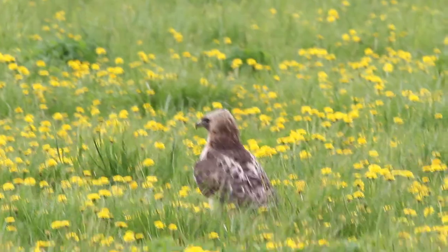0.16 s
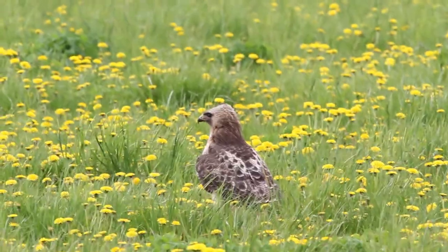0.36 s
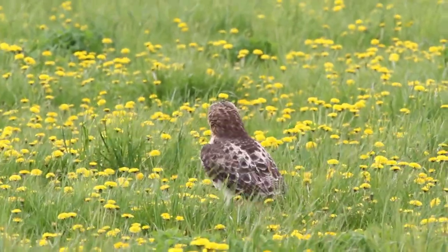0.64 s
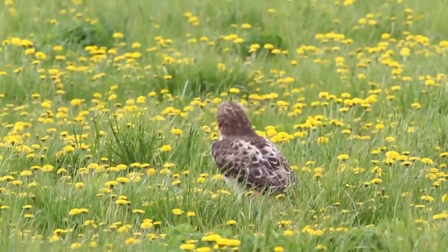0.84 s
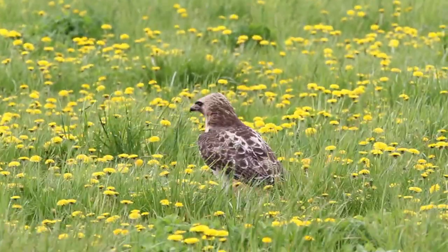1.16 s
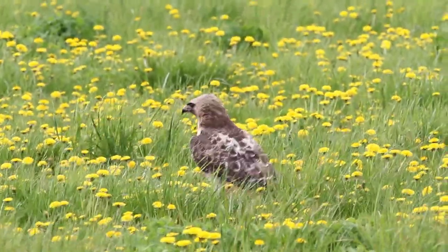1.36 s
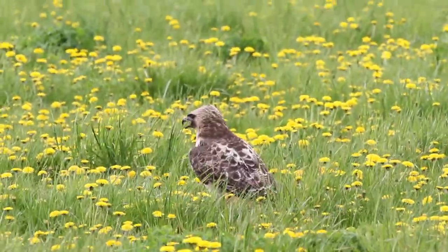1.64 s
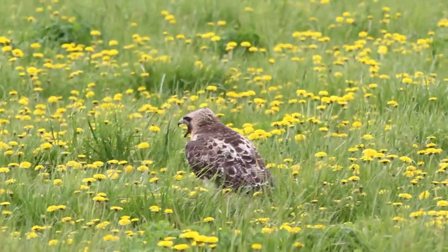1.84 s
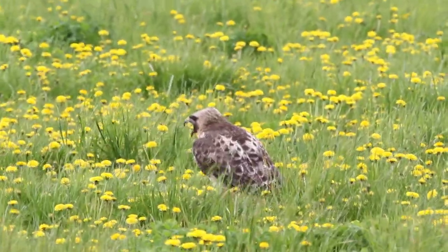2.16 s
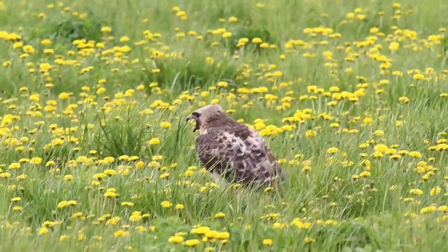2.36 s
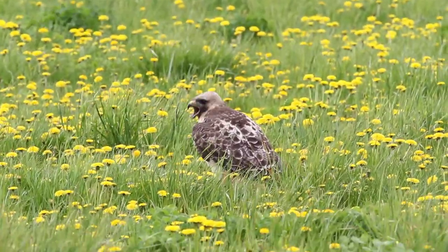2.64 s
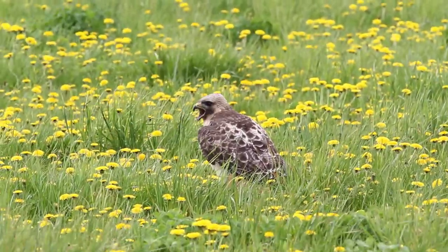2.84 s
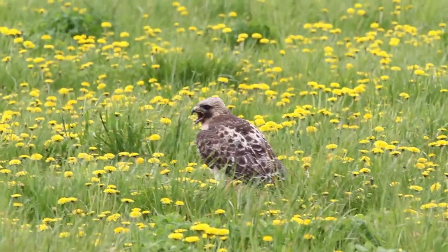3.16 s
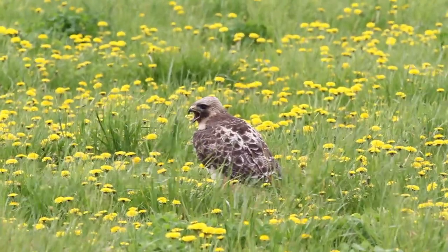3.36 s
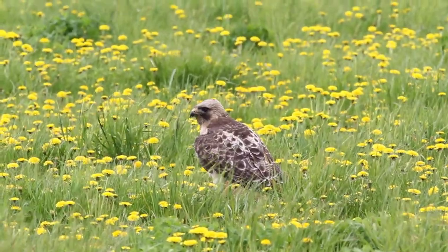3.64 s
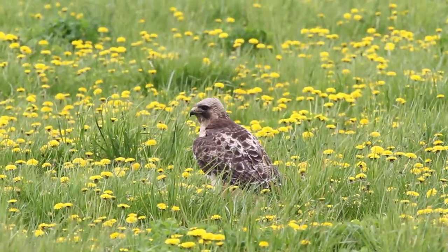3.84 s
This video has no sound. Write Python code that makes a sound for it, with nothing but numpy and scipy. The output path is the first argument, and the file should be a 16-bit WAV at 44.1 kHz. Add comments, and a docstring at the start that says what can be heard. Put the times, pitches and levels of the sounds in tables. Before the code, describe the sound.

Wind roars and thumps on an outdoor microphone over soft grassy hiss, then a hawk lets out one long, harsh, slightly falling scream, followed by stronger gusts; faint small birds chirp in the distance.

```python
"""A hawk on the ground in a meadow gives one long scream: a clear whistle that breaks into a hoarse rasp.
The scream is a jittered tone with its octave, plus throat-coloured noise.
Gusts buffet the microphone with a low roar, random pressure lumps and sharp thumps, all shaped pulses or noise.
Small birds far off whistle and chip as gliding tones; band noise rustles; patchy noise makes a soft field hiss."""
import sys
import numpy as np
from scipy import signal
from scipy.fft import rfft, irfft
from scipy.io import wavfile
from scipy.ndimage import uniform_filter1d

SR = 44100
rng = np.random.default_rng(int(sys.argv[2]) if len(sys.argv) > 2 else 0)


def digitize_waveform(pressure):
    """Quantize a signal to 16-bit integers and store it at the path in sys.argv[1].

    Rows of a 2-D input are taken as channels; values are limited to [-1, 1].
    """
    field = np.atleast_2d(pressure).T
    bounded = np.clip(field, -1, 1)
    quanta = np.round(bounded * 32767).astype(np.int16)
    wavfile.write(sys.argv[1], SR, quanta)


N = 176400

# Course of the gusts. Each row: time in seconds, relative level in dB.
GUSTS_S_DB = [(.07, -30), (.15, -24), (.4, -27.5), (.55, -36), (.66, -32.5), (.72, -13.5), (.76, -27.5),
              (.8, -40.5), (.97, -40.5), (1.12, -24.5), (1.25, -31), (1.33, -40.5), (1.65, -32),
              (1.92, -36.5), (1.97, -28), (2.05, -42), (2.13, -33.5), (2.17, -42), (2.3, -45),
              (2.35, -19.5), (2.42, -44), (2.6, -31), (2.72, -42.5), (2.9, -25.5), (3.05, -19), (3.3, -27),
              (3.42, -18), (3.5, -31.5), (3.7, -27), (3.9, -19.5)]
# Wind spectrum. Each row: frequency in Hz, relative density in dB.
WIND_HZ_DB = [(24, -13), (119, 4.5), (240, 1), (387, -11), (615, -23.5), (1200, -42.5), (1560, -58)]
# Sharp thumps. Each row: centre in seconds, level in dB before the tip is added, width scale in ms.
THUMPS = [(0.2116, -13.5, 1.9), (0.2242, -17.5, 1.32), (0.2442, -9.5, 2.02), (0.301, -14.5, 1.3),
          (.3336, -27.5, 0.61), (0.3878, -16.5, 1.9), (0.612, -13.5, 2.05), (0.7103, -11.5, 0.5),
          (0.7243, -16.5, 0.88), (1.1078, -23.5, 0.98), (1.1966, -15, 2.04), (1.2317, -29, 0.77),
          (1.6462, -23, 1.06), (1.9605, -19, 1.7), (2.3414, -17.5, 1.66), (2.3589, -15, 2.66),
          (2.6151, -12.5, 1.18), (2.9337, -29, .6), (2.9752, -10.5, 1.66), (2.9989, -8, 0.98),
          (3.0445, -9, 1.43), (3.061, -16.5, 0.84), (3.0809, -8.5, 0.94), (3.1874, -14, 1.5),
          (3.3661, -6, 0.97), (3.3894, -13.5, 1.53), (3.4058, -23.5, 0.61), (3.422, -16, 1.07),
          (3.4391, -8.5, 0.95), (3.5802, -13, 1.68), (3.7547, -5.5, 2.01), (3.8215, -23, 0.96),
          (3.8839, -7.5, 1.03), (3.9048, -6.5, 1.45), (3.9434, -4, 1.47), (3.9839, -12, 1.06)]
# Field hiss spectrum. Each row: frequency in Hz, relative density in dB.
FIELD_HZ_DB = [(400, -7.5), (569, -6), (774, -17.5), (1620, -12), (1800, -20), (2170, -22.5), (7170, -29.5),
               (11200, -28), (15700, -43.5)]
# Far songs. Each row: pitch shape (share of the note, Hz), notes (start in seconds, length in seconds, level in dB).
SONGS = [([(0, 4750), (.2, 4400), (.42, 4180), (1, 4240)], [(.33, .185, -69), (.93, .16, -68),
         (1.612, .15, -68)]), ([(0, 5720), (.2, 5960), (.6, 6030), (1, 5960)], [(2.915, .18, -50),
         (3.66, .11, -69)]), ([(0, 5000), (.28, 5090), (.72, 5270), (1, 5040)], [(3.09, .165, -35),
         (3.84, .2, -70)]), ([(0, 5200), (1, 5050)], [(1.382, .035, -62)])]
# Rising chips. Each row: start in seconds, relative level in dB, nominal pitch in Hz, length in seconds.
CHIPS = [(0.541, -44.5, 2700, 0.018), (0.623, -51, 3690, 0.017), (0.793, -40.5, 3360, 0.031),
         (0.903, -42, 2900, 0.02)]
# Rustles and a crackle. Each row: start in seconds, length in seconds, centre in Hz, width in Hz, level in dB.
RUSTLES = [(0.052, 0.1, 4660, 3170, -56), (0.707, 0.011, 1170, 770, -37), (0.909, .01, 9500, 6000, -56),
           (1.202, 0.004, 9500, 6000, -53), (1.314, 0.2, 10300, 3704, -62), (1.599, 0.24, 6040, 900, -63),
           (1.64, 0.032, 1430, 2290, -50.5), (2.16, 0.0046, 12150, 3000, -54)]
# Faint far tone. Each row: frequency in Hz, level in dB.
HUM_HZ_DB = [(1981, -63)]
# Course of the scream. Each row: time in seconds, pitch in Hz, whistle level in dB, rasp level in dB before RASP_GAIN_DB.
SCREAM = [(1.811, 2658, -51, -57), (1.84, 2800, -34, -51), (1.847, 2970, -23, -45.5),
          (1.886, 3227, -23.5, -44), (1.897, 3480, -32, -51), (1.925, 3330, -30.5, -47),
          (1.94, 3215, -30.5, -47.5), (1.98, 3080, -37.5, -47), (2.1, 2962, -39, -48.5),
          (2.62, 2906, -41, -51), (2.68, 2955, -36.5, -47), (3.535, 2897, -35, -48),
          (3.565, 2600, -41.5, -49), (3.594, 1870, -44, -64)]
# Roughness of the voice. Each row: time in seconds, roughness from 0 to 1.
ROUGH = [(1.84, .8), (1.848, .1), (1.886, .12), (1.895, .7), (2.05, .9), (2.8, .85), (3.05, .5)]
# Rasp colour with the head side-on. Each row: frequency in Hz, relative density in dB.
RASP_SIDE_HZ_DB = [(1250, -24.5), (1400, -13), (1550, -20), (1940, -16), (2290, -7), (3100, -6),
                   (3740, -14), (6100, -16), (7000, -21), (8500, -36.5), (9100, -24), (9600, -28.5),
                   (13500, -44.5)]
# Rasp colour after the head turns. Each row: frequency in Hz, relative density in dB.
RASP_TURNED_HZ_DB = [(1700, -22), (2300, -5), (2550, -6.5), (3100, -11.5), (3810, -15), (4450, -22),
                     (5390, -16.5), (6130, -24), (6630, -14.5), (8300, -36), (8900, -20), (9500, -33),
                     (10500, -28), (13500, -50)]
# Second strands as the voice breaks in. Each row: start in seconds, length in seconds, from Hz, to Hz, level in dB.
STRANDS = [(1.835, .02, 2560, 2600, -36), (1.858, .032, 2540, 2600, -38), (1.89, .026, 4560, 4500, -44)]

LUMPS_PER_S, LUMP_SPREAD_DB = 240, 3.5
LUMP_DB, ROAR_DB = -0.5, -5.5  # relative to the gusts' rms
TIP_DB, TIP_NARROWING = -8, 1.76  # each thump has a narrower tip
FIELD_DB = -53.5
HUM_START_S = 3.6
OVERTONE_STEP_DB = -21  # each whistle overtone against the one below
FUZZ_WIDTH_HZ, FUZZ_SHARE = 300, .35
JITTER_SCALE_HZ, JITTER_WIDTH_HZ = 155, 140  # scale at roughness 1
STEADY_S = .022  # over this time the pitch always returns to its course
OCTAVE_DB, OCTAVE_DB_PER_DB = -14.5, 0.6  # at full effort; extra loss per dB of less effort
RASP_GAIN_DB = 9
HEAD_TURN_S, HEAD_TURN_LEN_S = 2.64, .03
OPEN_S, OPEN_RAMP_S, BAND_EDGE_HZ = .0705, .00165, 15800


def amp(db):
    """Amplitude ratio of a level in dB."""
    return 10 ** (np.asarray(db) / 20)


def evened(x):
    """Scales x to rms 1."""
    return x / np.sqrt(np.mean(x ** 2) + 1e-20)


def add(mix, start_s, sound):
    """Adds a sound into the mix in place, cut at the mix's end."""
    part = mix[round(start_s * SR):][:len(sound)]
    part += sound[:len(part)]


def curve(table, t):
    """Interpolates every column of a table against its first."""
    x, *columns = np.transpose(table)
    return [np.interp(t, x, column) for column in columns]


def coloured(x, points):
    """Filters x by a (Hz, dB) spectrum, straight on log frequency."""
    point_hz, db = np.transpose(points)
    hz = np.fft.rfftfreq(len(x), 1 / SR)
    gain_db = np.interp(np.log(hz + 1), np.log(point_hz), db, db[0] - 2.0, db[-1] - 33)
    return irfft(rfft(x) * amp(gain_db), len(x))


def slow(n, width_hz):
    """Complex noise smoothed by two equal one-pole filters, rms 1."""
    z = rng.standard_normal(n) + 1j * rng.standard_normal(n)
    pole = np.exp(-np.pi * width_hz / SR)
    z = signal.lfilter([1], np.convolve([1, -pole], [1, -pole]), z)
    return z / np.sqrt(np.mean(abs(z) ** 2))


def patchy(x, patch_db):
    """Random louder and softer patches across time and frequency, rms 1."""
    z = signal.stft(x, SR, nperseg=512)[2]
    patches = uniform_filter1d(rng.standard_normal(z.shape), 8, 0)
    patches = evened(uniform_filter1d(patches, 10, 1))
    return evened(signal.istft(z * amp(patch_db * patches), SR, nperseg=512)[1][:len(x)])


def lobe(u):
    """A central pressure swing with small opposite swings either side."""
    return np.cos(2 * np.pi * u) * np.exp(-(u / np.where(u < 0, .55, .7)) ** 2)


def wind():
    """Gusts play a low roar and random pressure lumps; the strongest lumps are sharp thumps."""
    gust = amp(curve(GUSTS_S_DB, np.arange(N) / SR)[0])
    draw = rng.random((N, 3))
    sign = np.sign(draw[:, 0] - .5)
    struck = draw[:, 1] < LUMPS_PER_S / SR
    lumps = sign * struck * amp(-LUMP_SPREAD_DB * np.log(draw[:, 2] + .04))
    out = amp(LUMP_DB) * evened(coloured(gust * lumps, WIND_HZ_DB))
    out += amp(ROAR_DB) * evened(coloured(gust * rng.standard_normal(N), WIND_HZ_DB))
    out *= np.sqrt(np.mean(gust ** 2))
    ms = np.arange(-SR // 100, SR // 50) * 1e3 / SR  # from 10 ms before the centre
    for centre_s, db, width_ms in THUMPS:
        u = ms / (2.744 * width_ms)
        add(out, centre_s - .01, -amp(db) * (lobe(u) + amp(TIP_DB) * lobe(TIP_NARROWING * u)))
    return np.tanh(out)  # the strongest pushes flatten softly


def field():
    """Soft hiss of grass and air: coloured noise with uneven patches."""
    return amp(FIELD_DB) * patchy(coloured(rng.standard_normal(N), FIELD_HZ_DB), 1.04)


def whistle(shape, length_s, db):
    """A wavering near sine that follows a pitch shape and has faint overtones."""
    u = np.arange(0, 1, 1 / (length_s * SR))
    hz = uniform_filter1d(curve(shape, u)[0], len(u) // 8, mode="nearest")
    hz = hz * (1 + 0.006 * slow(len(u), 130).real)
    phase = 2 * np.pi * np.cumsum(hz) / SR
    tone = np.sin(phase) + amp(OVERTONE_STEP_DB) * np.sin(2 * phase)
    tone += amp(2 * OVERTONE_STEP_DB) * np.sin(3 * phase)
    level = np.sqrt(2) * amp(db + 5.5 * slow(len(u), 50).real)
    return level * np.sin(np.pi * u ** 0.8) ** .6 * tone


def rustle(length_s, centre_hz, width_hz, db):
    """Band noise that swells quickly and fades."""
    u = np.arange(0, 1, 1 / (length_s * SR))
    edges_hz = np.clip([centre_hz - width_hz / 2, centre_hz + width_hz / 2], 300, 18000)
    band = signal.butter(3, edges_hz, "band", fs=SR)
    noise = evened(signal.lfilter(*band, rng.standard_normal(len(u))))
    return amp(db) * np.sin(np.pi * u ** .5) * noise


def chip(db, hz, length_s):
    """A breathy note: narrow noise carried on a rising pitch."""
    u = np.arange(0, 1, 1 / (length_s * SR))
    phase = 2 * np.pi * np.cumsum(hz * (.78 + .4 * u)) / SR
    breathy = (slow(len(u), 1200) * np.exp(1j * phase)).real
    return 0.43 * amp(db) * np.sin(np.pi * u ** 0.91) * breathy


def far_tone():
    """A faint held sine with a wavering level."""
    t = np.arange(N) / SR
    rise = np.clip((t - HUM_START_S) / 0.0084, 0, 1)
    out = np.zeros(N)
    for hz, db in HUM_HZ_DB:
        level = np.sqrt(2) * amp(db + 2.5 * slow(N, 22).real)
        out += rise * level * np.sin(2 * np.pi * hz * t)
    return out


def birds():
    """Places the rustles, far songs and chips, and adds the held tone."""
    out = far_tone()
    for start_s, length_s, centre_hz, width_hz, db in RUSTLES:
        add(out, start_s, rustle(length_s, centre_hz, width_hz, db))
    for shape, notes in SONGS:
        for start_s, length_s, db in notes:
            add(out, start_s, whistle(shape, length_s, db))
    for start_s, db, hz, length_s in CHIPS:
        add(out, start_s, chip(db, hz, length_s))
    return out


def hawk_voice(hz, tone_db, rough):
    """A tone and its octave; roughness jitters the pitch and blurs the wave."""
    n = len(hz)
    jitter = slow(n, JITTER_WIDTH_HZ).real
    jitter = jitter - uniform_filter1d(jitter, round(STEADY_S * SR))
    phase = 2 * np.pi * np.cumsum(hz + JITTER_SCALE_HZ * rough * jitter) / SR
    blur = 1 + FUZZ_SHARE * rough * slow(n, FUZZ_WIDTH_HZ)
    tone = (blur * np.exp(1j * phase)).real
    octave = (blur ** 2 * np.exp(2j * phase)).real
    effort_db = tone_db - tone_db.max()
    voice = tone + amp(OCTAVE_DB + OCTAVE_DB_PER_DB * effort_db) * octave
    return np.sqrt(2) * amp(tone_db) * voice


def hawk_rasp(t, rasp_db):
    """Turbulent air coloured by the throat; the colour crossfades as the head turns."""
    air = patchy(rng.standard_normal(len(t)), 2.6) * amp(1.8 * slow(len(t), 120).real)
    turned = np.clip((t - HEAD_TURN_S) / HEAD_TURN_LEN_S, 0, 1)
    side_on = (1 - turned) * evened(coloured(air, RASP_SIDE_HZ_DB))
    rasp = side_on + turned * evened(coloured(air, RASP_TURNED_HZ_DB))
    return amp(rasp_db + RASP_GAIN_DB) * rasp


def hawk():
    """One scream: voice and rasp together, with short second strands."""
    t = np.arange(SCREAM[0][0], SCREAM[-1][0], 1 / SR)
    hz, tone_db, rasp_db = curve(SCREAM, t)
    rough = curve(ROUGH, t)[0]
    edge = np.minimum(np.minimum(t - t[0], t[-1] - t) / 0.002, 1)
    out = np.zeros(N)
    add(out, t[0], edge * (hawk_voice(hz, tone_db, rough) + hawk_rasp(t, rasp_db)))
    for start_s, length_s, from_hz, to_hz, db in STRANDS:
        add(out, start_s, whistle([(0, from_hz), (1, to_hz)], length_s, db))
    return out


def scene():
    """Sums all sources into one channel."""
    return (wind() + field() + birds() + hawk())[None]


def record(dry):
    """The microphone opens just after the start; then a low-pass limits the band."""
    opened = dry * np.clip((np.arange(N) / SR - OPEN_S) / OPEN_RAMP_S, .003, 1)
    low_pass = signal.firwin(511, BAND_EDGE_HZ, window=("kaiser", 9), fs=SR)
    return signal.oaconvolve(opened, low_pass[None], "same")


dry = scene()
out = record(dry)
digitize_waveform(out)
```